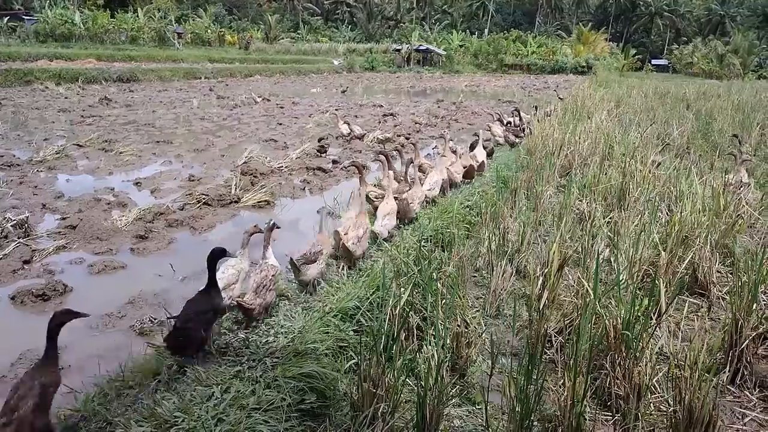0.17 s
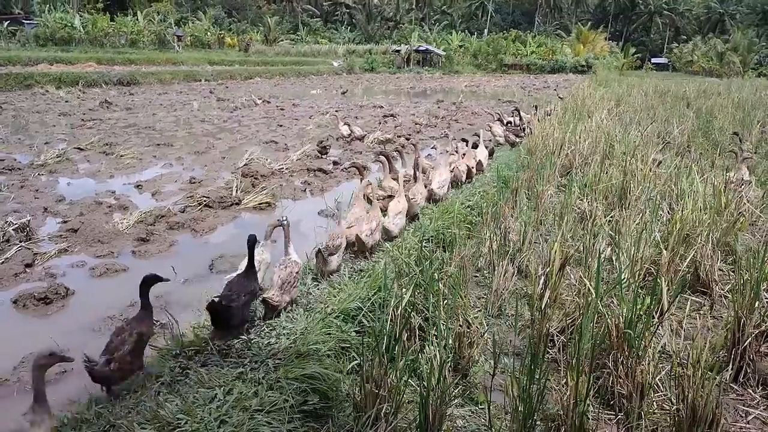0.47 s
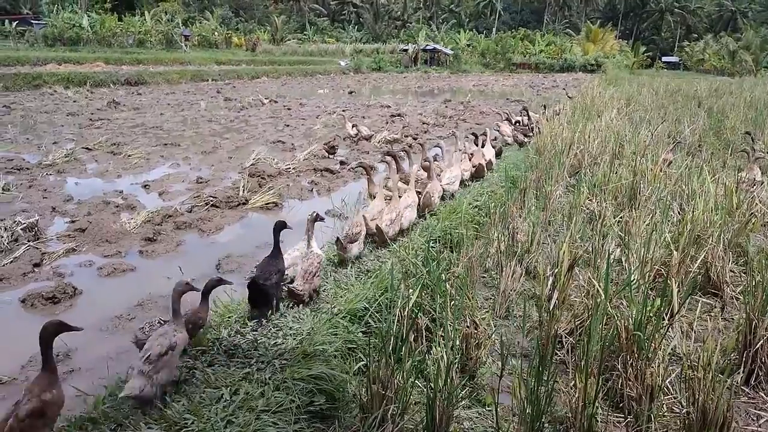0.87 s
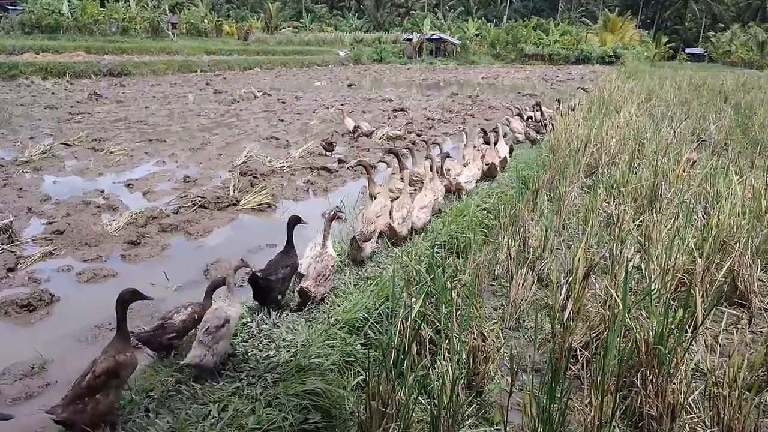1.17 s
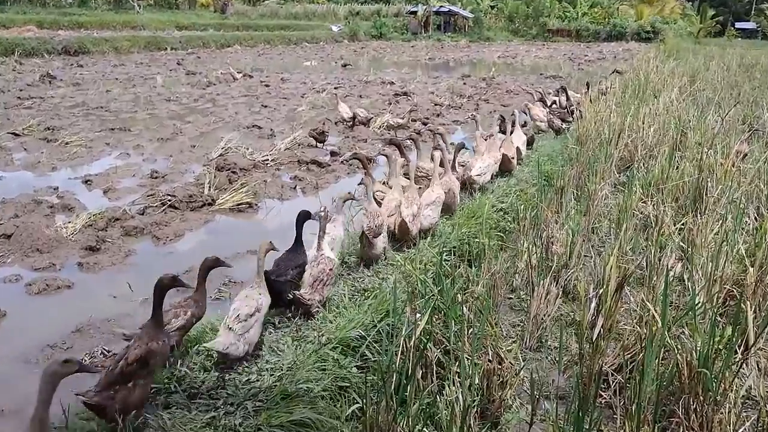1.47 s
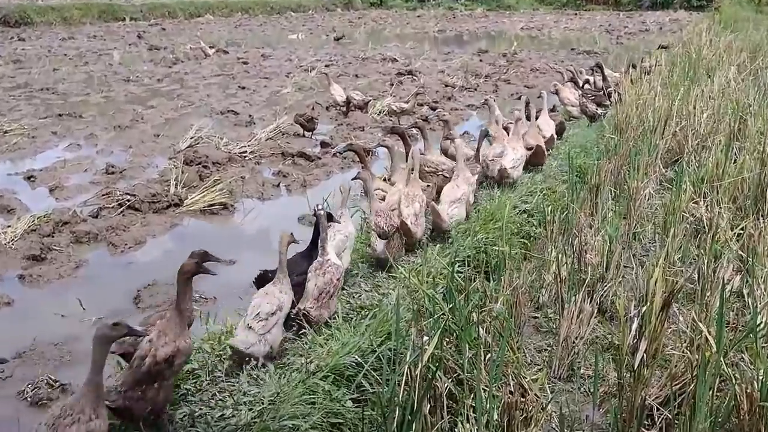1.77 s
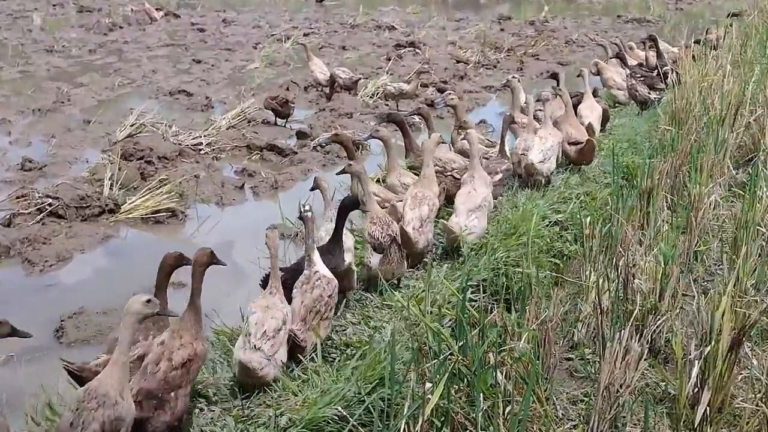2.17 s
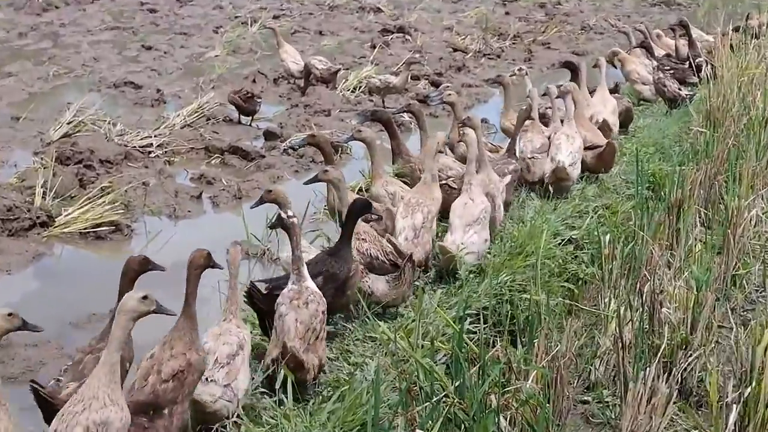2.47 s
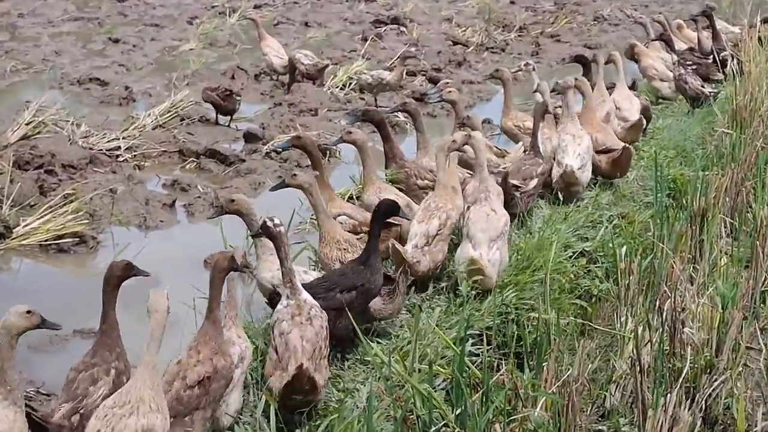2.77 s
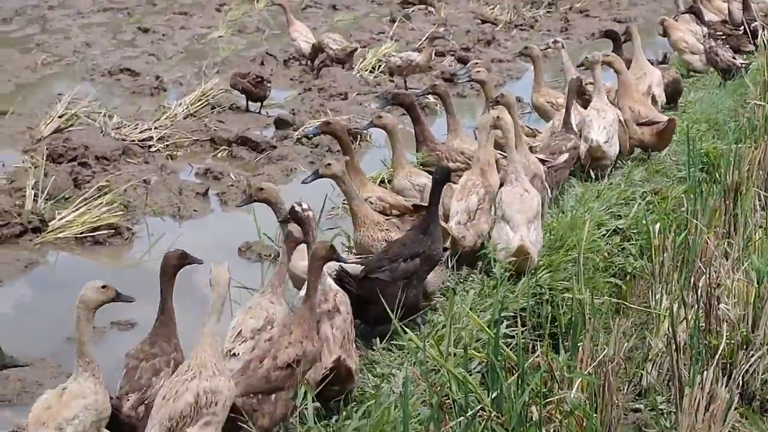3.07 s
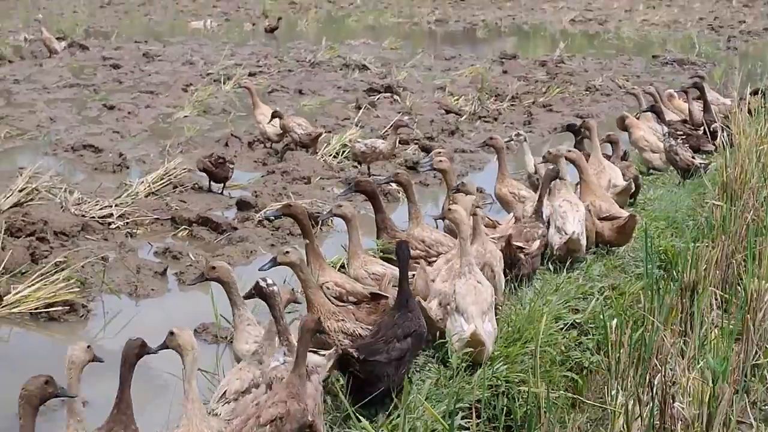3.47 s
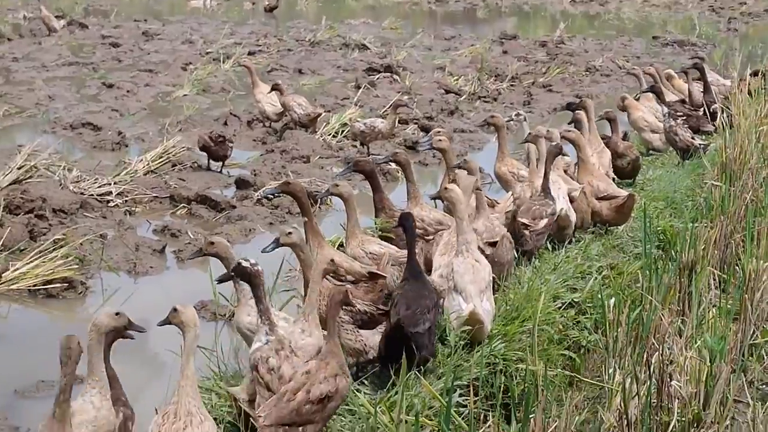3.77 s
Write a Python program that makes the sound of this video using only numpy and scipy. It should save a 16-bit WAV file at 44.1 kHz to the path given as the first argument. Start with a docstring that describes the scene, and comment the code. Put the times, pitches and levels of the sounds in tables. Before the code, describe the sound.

Nearby ducks quack again and again in an open field, their calls overlapping over steady wind. A quick scraping knock sounds at the microphone about a second in, and later a distant engine hums faintly under the flock.

```python
"""Ducks along a rice field

A flock of ducks files along the bank of a muddy rice field, chattering in short, low quacks.
Each quack is a train of air pulses that ring the chest, throat and bill. Mud and grass scatter
each call; the far end of the flock murmurs. Wind rumbles and hisses in the rice, a faint engine
drones far off, and a brief double scrape knocks at the microphone."""
import sys
import numpy as np
from scipy import signal
from scipy.fft import rfft, irfft, next_fast_len
from scipy.io import wavfile
from scipy.ndimage import map_coordinates

SR = 44100
rng = np.random.default_rng(int(sys.argv[2]) if len(sys.argv) > 2 else 0)


def persist_wave(psi):
    """Save psi, clipped to +-1, as 16-bit WAV."""
    counts = np.round(np.clip(psi, -1, 1) * 32767).astype(np.int16)
    wavfile.write(sys.argv[1], SR, np.atleast_2d(counts).T)


N = 173313

# The near quacks. Each row: start, rise and fall in seconds, level in dB, top pitch in Hz,
# throat and chest resonances in Hz, chest and bill strengths in dB, roughness from 0 to 1.
QUACKS = [ (0.140, 0.014, 0.043, -37.5, 176.4, 1520, 1090, -3, -19, 0.35),
          (0.168, 0.022, 0.039, -34.5, 170.5, 1495, 1050, -3, -9, 0.4),
          (0.268, 0.015, 0.044, -37, 164.9, 1490, 1020, -6.5, -8, 0.2),
          (0.319, 0.024, 0.045, -40.5, 192, 1630, 920, -2.5, 1, 0.45),
          (0.396, 0.023, 0.031, -31.5, 168.5, 1536, 1100, -8.5, -6, 0),
          (0.603, 0.023, 0.036, -30, 174.1, 1370, 970, -9, -3.5, 0.35),
          (0.638, .017, 0.027, -28.5, 182.4, 1490, 1120, -23, -11, 0.14),
          (0.780, 0.03, 0.04, -32.5, 225.7, 1802, 970, -11, -4, .7),
          (0.849, .030, 0.022, -35.5, 192.2, 1370, 1110, -5, -14, 0.2),
          (1.120, 0.03, 0.07, -32.5, 168.5, 1480, 770, -13, -10.5, 0.37),
          (1.199, .018, 0.017, -45.5, 131, 1420, 800, 9, 8, 0.79),
          (1.364, .027, 0.046, -36, 160.3, 1480, 945, -7.5, -4.5, 0.33),
          (1.402, 0.024, 0.047, -29.5, 181.9, 1470, 835, -13.5, -10.5, 0.19),
          (1.628, 0.023, 0.021, -38, 148.2, 1410, 1085, -3, -8, 0.4),
          (1.662, 0.0131, 0.0424, -30.5, 182.6, 1504, 765, -15, -7.5, 0.25),
          (1.720, .035, .045, -38, 243, 1440, 930, 7, 8, .13),
          (1.902, 0.026, 0.055, -37.5, 160.4, 1530, 904, -11, -6, 0.36),
          (2.107, 0.017, 0.017, -36.5, 130.5, 1500, 1000, -9, -6, 0.2),
          (2.149, 0.03, .033, -33.5, 200.9, 1410, 830, -12.5, -9.5, 0.31),
          (2.380, 0.022, .030, -31, 240.7, 1464, 845, -13.5, -1, 0.19),
          (2.515, .031, 0.035, -35, 231.6, 1450, 910, -5, -4.5, 0.51),
          (2.633, 0.0046, 0.0087, -41.5, 140, 1460, 950, -17, -5.5, 0.24),
          (2.818, .018, 0.031, -40.5, 125.4, 1420, 950, -13, -6.5, .04),
          (2.964, 0.032, 0.053, -38.5, 237.2, 1400, 970, -3, -3, .2),
          (3.024, 0.039, 0.043, -38.5, 144.3, 1440, 960, -10.5, -7.5, 0.07),
          (3.121, 0.025, 0.036, -35.5, 219.2, 1530, 1050, -2.5, -12.5, 0.33),
          (3.366, 0.017, 0.027, -44.5, 98.3, 1350, 890, -5, -13, 0.08),
          (3.397, .029, 0.042, -36, 176.8, 1420, 880, -7.5, -3.5, 0.24),
          (3.485, 0.016, 0.032, -43, 115.3, 1340, 950, -16, -2.5, 0.22),
          (3.605, 0.047, 0.029, -41.5, 148.5, 1480, 1090, -23, -14, 0.4),
          (3.661, 0.013, 0.031, -37, 149.8, 1370, 950, -33, -7, 0.14),
          (3.85, 0.029, .046, -37, 170.6, 1460, 860, -10.5, -6, 0.15), ]
# The soft clucks. Each row: start and length in seconds, level in dB, top pitch in Hz,
# throat resonance in Hz.
CLUCKS = [ (0.000, 0.052, -47.5, 188.5, 1260), (0.490, 0.06, -41.5, 158, 1150),
          (0.916, .056, -39, 141, 1430), (1.939, 0.07, -44, 259.3, 1600), (2.090, 0.0458, -40, 271.4, 1020),
          (2.332, .055, -44, 256, 970), (2.419, 0.042, -43.5, 220, 1050), (2.672, 0.071, -45.5, 170, 1520),
          ]
# Where the callers stand. Each row: time in seconds, degrees to the left.
BEARINGS = [(.2, 33), (.8, 105), (.87, 14), (2.2, 12), (2.36, 28.3), (2.9, 5)]


def flock():
    """Near ducks quack and cluck over the far ones, with a faint echo from the open field."""
    calls = np.zeros((2, N))
    for start, rise, fall, db, *voice in QUACKS:
        bearing = np.interp(start, *np.transpose(BEARINGS))
        add(calls, start, amp(db) * mud_and_grass(quack(rise, fall, *voice), bearing))
    for start, length, db, *voice in CLUCKS:
        bearing = np.interp(start, *np.transpose(BEARINGS))
        add(calls, start, amp(db) * mud_and_grass(cluck(length, *voice), bearing))
    calls += far_ducks()
    balance = amp([[-1.46], [1.46]])  # the right side is a little louder
    return (calls + amp(-11) * echo(calls, fade_s=0.31)) * balance


# How the bill rings. Each row: frequency in Hz, dB added to the quack's bill strength.
BILL_RESONANCES = [(1850, 3.5), (2300, -2.5)]
# How the breathy rasp rings. Each row: frequency in Hz, width in Hz, relative level in dB.
RASP_RESONANCES = [(4600, 1580, 4), (5830, 780, 7.5), (7220, 1070, 2.5)]


def quack(rise, fall, pitch_hz, throat_hz, chest_hz, chest_db, bill_db, rough):
    """Pulses ring chest, throat and bill; the bill opens with the effort of the call."""
    effort, source, breath = syrinx(rise, fall, pitch_hz, rough)
    throat_and_bill = [(throat_hz, 140, 2.5)] + [(hz, 190, db + bill_db) for hz, db in BILL_RESONANCES]
    bill_open = [(chest_hz, 280, chest_db)] + throat_and_bill
    bill_shut = [(chest_hz, 280, chest_db + 4)] + throat_and_bill
    shut_shift = 0.9  # a nearly shut bill lowers every resonance
    voice = filtered(source * effort, lambda hz: resonances(hz, bill_open))
    voice += filtered(source * (1 - effort), lambda hz: resonances(hz / shut_shift, bill_shut))
    voice = signal.sosfilt(signal.butter(2, 450, 'high', fs=SR, output='sos'), voice)
    voice = signal.sosfilt(signal.butter(5, 2480, 'low', fs=SR, output='sos'), voice)
    rasp = filtered(breath, lambda hz: resonances(hz, RASP_RESONANCES))
    rasp_db = -23 + 17 * rough + 0.46 * bill_db
    return (unit(voice) + amp(rasp_db) * unit(rasp)) * np.sqrt(np.mean(effort ** 2))


def cluck(length, pitch_hz, throat_hz):
    """A soft, clean note with the bill shut: only the throat rings."""
    effort, source, _ = syrinx(length / 2, length / 2, pitch_hz, rough=0)
    voice = filtered(source, lambda hz: resonances(hz, [(throat_hz, 290, 0)]) ** 2)
    return unit(voice) * np.sqrt(np.mean(effort ** 2))


def syrinx(rise, fall, pitch_hz, rough):
    """The duck's voice box chops one push of air into pulses; pitch and level follow the effort."""
    t = np.arange(SR // 6) / SR
    effort = np.sin(np.pi / 2 * np.interp(t, [0, rise, rise + fall], [0, 1, 0]))
    cycles = np.cumsum(pitch_hz * (0.7 + 0.3 * effort)) / SR
    jitter_cycles, shimmer_db, puff_s = 0.004 + 0.035 * rough, 1.2, 0.003
    timing, size = rng.standard_normal((2, 48))
    beats = np.arange(len(timing)) + 0.5 + jitter_cycles * timing  # one uneven pulse per cycle
    pulses = np.bincount(np.searchsorted(cycles, beats), amp(shimmer_db * size), len(t) + 1)[:-1]
    puff_shape = signal.lfilter([1], [1, -np.exp(-1 / (puff_s * SR))], pulses)
    puffs = unit(puff_shape * rng.standard_normal(len(t)))  # a dying hiss after each pulse
    swell = effort ** 1.15
    source = swell * ((1 - rough) * unit(pulses) + rough * puffs)
    return effort, source, swell * puffs


def mud_and_grass(call, bearing):
    """The call and its bounce off wet mud reach the nearer side first; scatter from the grass follows."""
    lead_s = 0.0002 * np.sin(np.radians(bearing)) * np.array([[0.5], [-0.5]])
    bounce_s = 0.0016 * rng.uniform(0.49, 1.972)
    pair = filtered(call, lambda hz: delay(hz, -lead_s) * (1 + 0.2 * delay(hz, bounce_s)))
    scatter = amp(-8) * unit(echo(pair, fade_s=0.035))
    return np.std(call) * unit(unit(pair) + scatter)


def far_ducks(count=36):
    """Faint quacks with random voices and loose timing murmur from straight ahead."""
    out = np.zeros((2, N))
    for k, (timing, size, pitch, throat) in enumerate(rng.standard_normal((count, 4))):
        call = quack(rise=0.03, fall=0.04, pitch_hz=165 * np.exp(0.15 * pitch),
                     throat_hz=1520 * np.exp(0.1 * throat),
                     chest_hz=900, chest_db=-8, bill_db=-8, rough=0.4)
        start = (k + 1 + timing / 2) * N / SR / count
        add(out, start, amp(-57.5 + 7.5 * size) * mud_and_grass(call, bearing=0))
    return out


# The two scrapes. Each row: start in seconds, length in seconds, level in dB.
SCRAPES = [(1.007, .006, -40), (1.031, .015, -37.5)]
# Their tone colour. Each row: frequency in Hz, relative level in dB.
SCRAPE_COLOUR = [(200, -16), (800, 15.5), (1600, 6), (3300, 14), (14000, -3)]
# Taps on the microphone's case. Each row: time in seconds, strength in dB.
TAPS = [(1.01, -12.5), (1.029, -15), (1.0352, -13)]
# How the case rings. Each row: frequency in Hz, width in Hz, gain in dB.
CASE_RESONANCES = [(3550, 4000, -6), (7000, 2900, -1.5)]


def knock():
    """Two abrupt scrapes at the microphone, and sharp taps that make its case tick."""
    scrapes, taps = np.zeros((2, N)), np.zeros(N)
    for start, length, db in SCRAPES:
        noise = rush(SCRAPE_COLOUR, side_db=-2, flutter_db=-2.5)
        add(scrapes, start, amp(db) * noise[:, :int(length * SR)])
    for start, db in TAPS:
        taps[round(start * SR)] = amp(db)
    return scrapes + filtered(taps, lambda hz: resonances(hz, CASE_RESONANCES))


# The tone colours of the wind's three layers. Each row: frequency in Hz, relative level in dB.
HISS_COLOUR = [(3000, -17.5), (7500, 11), (11000, 4.5), (14000, 11.5)]
AIR_COLOUR = [(60, -84), (110, -5), (300, -4), (460, -11.5), (1200, -16), (1700, -18.5), (3000, -25.5),
              (7500, -40), (11000, -124)]
RUMBLE_COLOUR = [(25, 0.5), (58, 8), (80, 8), (105, -2.5), (160, 0), (450, -61)]
# How each layer swells and sinks. Each row: time in seconds, level in dB.
HISS_LEVEL = [(0, -68), (.3, -58), (1.05, -57), (2.6, -59), (3.6, -61.5)]
AIR_LEVEL = [(0, -58), (.15, -46), (.8, -47.5), (2.3, -48), (3.2, -47), (3.8, -46)]
RUMBLE_LEVEL = [(0, -48), (.4, -47), (2, -46.5), (3.9, -45)]


def wind():
    """Wind hisses in the rice stalks, rushes through the open air and rumbles low."""
    hiss = level(HISS_LEVEL) * rush(HISS_COLOUR, side_db=-23, flutter_db=1.3)
    air = level(AIR_LEVEL) * rush(AIR_COLOUR, side_db=-4.5, flutter_db=2.0)
    rumble = level(RUMBLE_LEVEL) * rush(RUMBLE_COLOUR, side_db=-15, flutter_db=-1.5)
    return rumble + air + hiss


# The engine's tones. Each row: pitch in Hz, time of the swell's peak in seconds,
# its spread to either side in seconds, level at the peak in dB.
ENGINE_TONES = [(57.3, 3.1, .48, -45), (75.5, 4.2, 3.2, -53.5), (175, 3.72, .22, -46.5)]


def engine():
    """Wavering low tones of a distant engine swell and fade."""
    t, out = np.arange(N) / SR, np.zeros(N)
    for hz, peak_s, spread_s, db in ENGINE_TONES:
        tone = amp(1.5 * wobble(8)) * np.sin(2 * np.pi * hz * t + 0.55 * wobble(6))
        swell = np.exp(-0.5 * ((t - peak_s) / spread_s) ** 2)
        out += np.sqrt(2) * amp(db) * swell * tone
    return out


def rush(colour, side_db, flutter_db):
    """Coloured stereo noise with a fluttering level; a higher side_db makes it wider."""
    points_hz, points_db = np.transpose(colour)
    mid, side = filtered(rng.standard_normal((2, N)),
                         lambda hz: amp(np.interp(np.log(hz + 1), np.log(points_hz + 1), points_db)))
    side = side * amp(side_db)
    return unit(np.array([mid + side, mid - side]) * amp(flutter_db * wobble(12)))


def echo(x, fade_s):
    """A blur of reflections, different left and right, that falls 60 dB in fade_s seconds."""
    t = np.arange(SR // 3) / SR
    tail = rng.standard_normal((2, len(t))) * amp(-60 * t / fade_s)
    return signal.fftconvolve(x, tail / np.linalg.norm(tail[0]), axes=1)[:, :x.shape[1]]


def resonances(hz, modes):
    """A response that rings at each mode, given as centre in Hz, width in Hz, gain in dB."""
    return sum((-1) ** k * amp(db) * 1j * hz * width / (centre ** 2 - hz ** 2 + 1j * hz * width)
               for k, (centre, width, db) in enumerate(modes))


def delay(hz, seconds):
    """A response that makes a sound arrive later."""
    return np.exp(-2j * np.pi * hz * seconds)


def filtered(x, response):
    """Scale and shift each frequency in x by response(hz)."""
    length = x.shape[-1]
    padded = next_fast_len(length + 2048)
    return irfft(rfft(x, padded) * response(np.fft.rfftfreq(padded, 1 / SR)), padded)[..., :length]


def wobble(rate):
    """A smooth curve through `rate` random values a second."""
    return map_coordinates(rng.standard_normal(int(N * rate / SR) + 4), [np.arange(N) * rate / SR])


def level(rows):
    """A gain for every sample, from rows of seconds and dB."""
    return amp(np.interp(np.arange(N) / SR, *np.transpose(rows)))


def amp(db):
    """Turn decibels into a gain."""
    return 10 ** (np.asarray(db) / 20)


def unit(x):
    """Scale x to an average power of 1."""
    return x / np.sqrt(np.mean(x ** 2) + 1e-20)


def add(out, start_s, x):
    """Mix x into out, beginning at start_s."""
    i = max(0, round(start_s * SR))
    out[..., i:i + x.shape[-1]] += x[..., :max(0, N - i)]


def scene():
    """Everything together in stereo; only the close knock reaches the very top of the treble."""
    return filtered(flock() + wind() + engine(), lambda hz: hz < 14400) + knock()


def record(dry):
    """Cut away the highest treble."""
    return filtered(dry, lambda hz: hz < 16300)


dry = scene()
out = record(dry)
persist_wave(out)
```